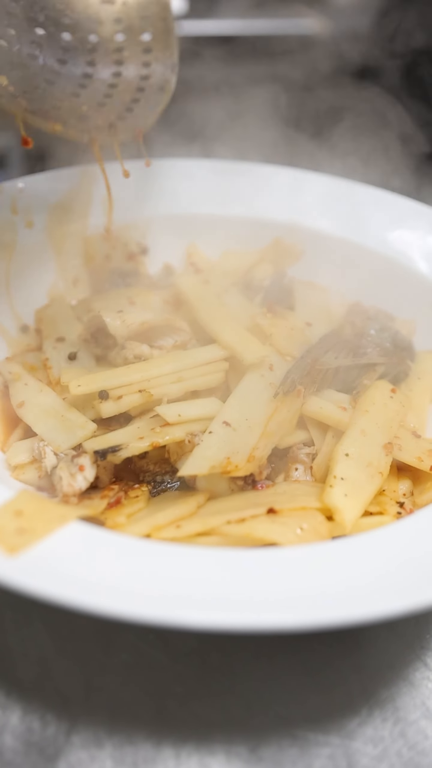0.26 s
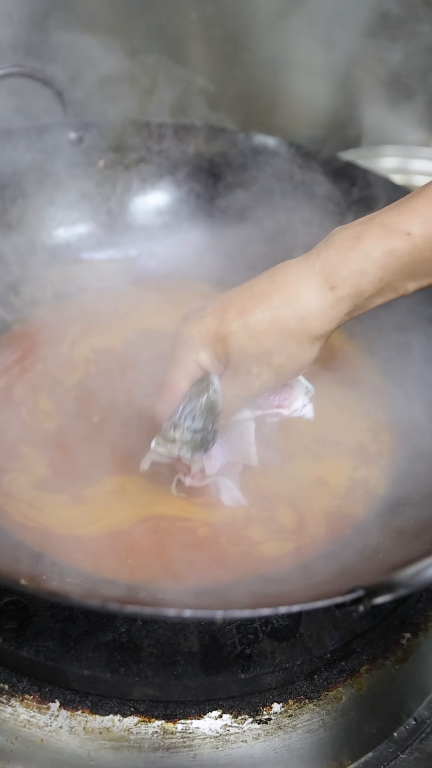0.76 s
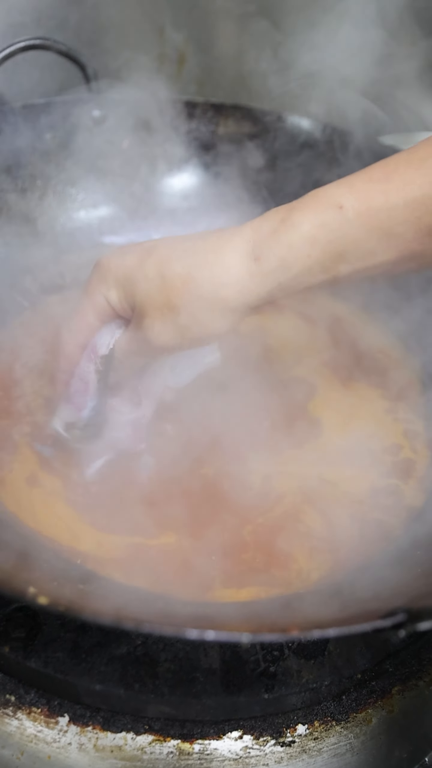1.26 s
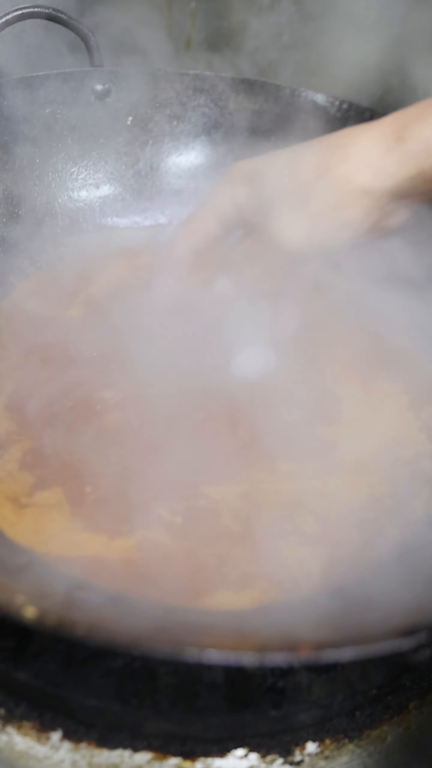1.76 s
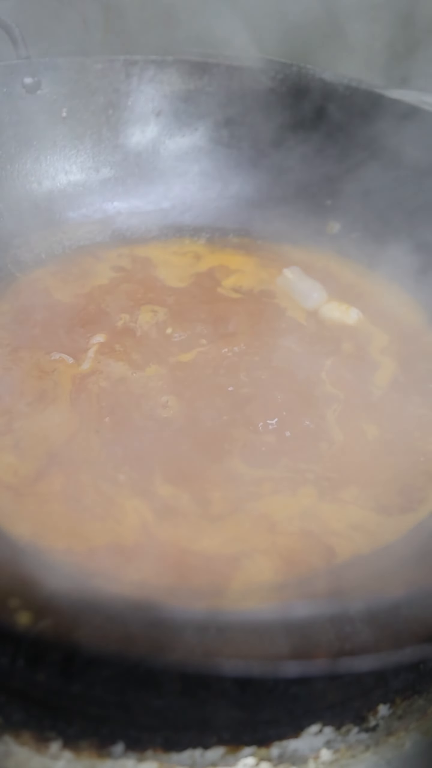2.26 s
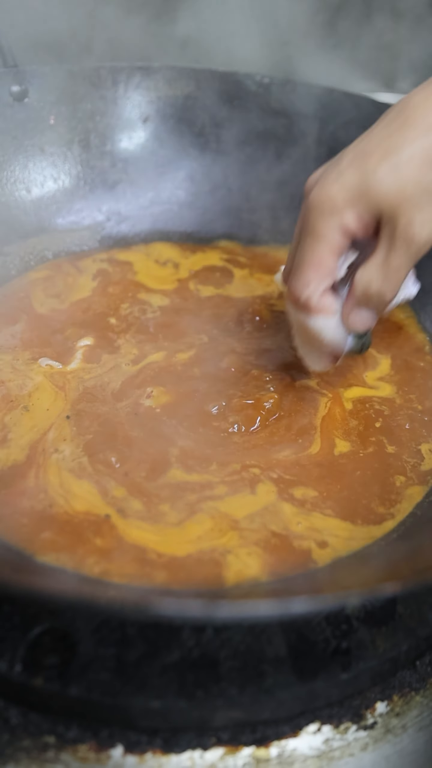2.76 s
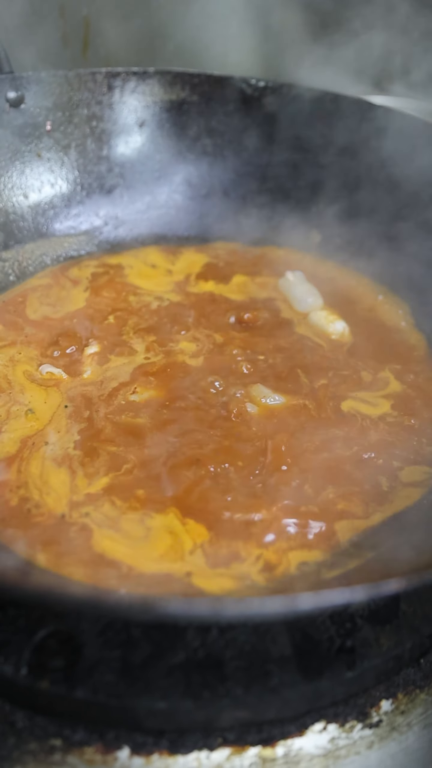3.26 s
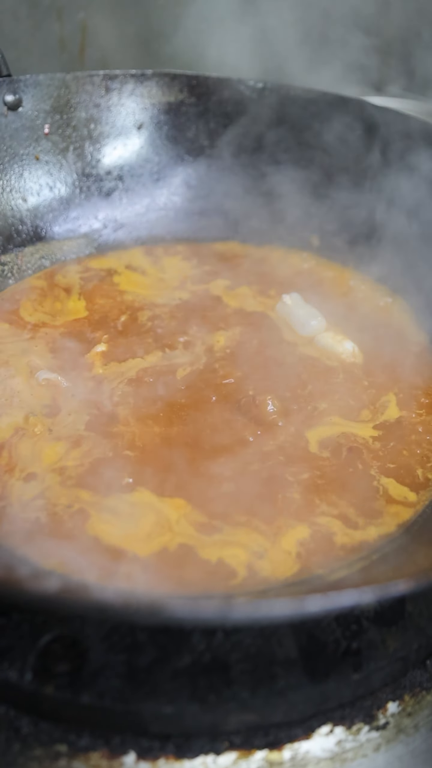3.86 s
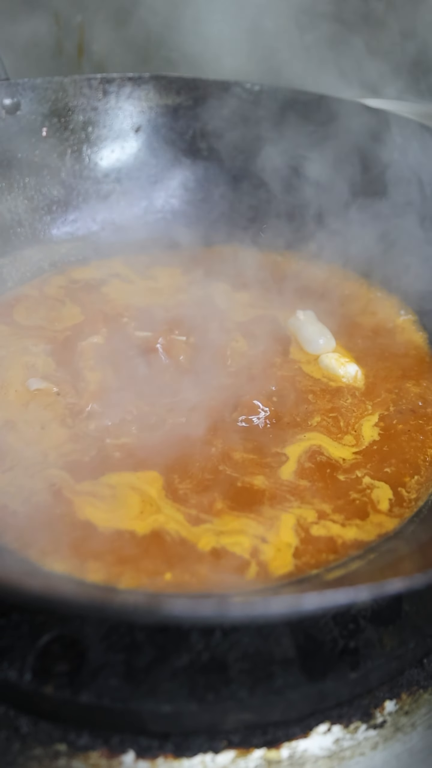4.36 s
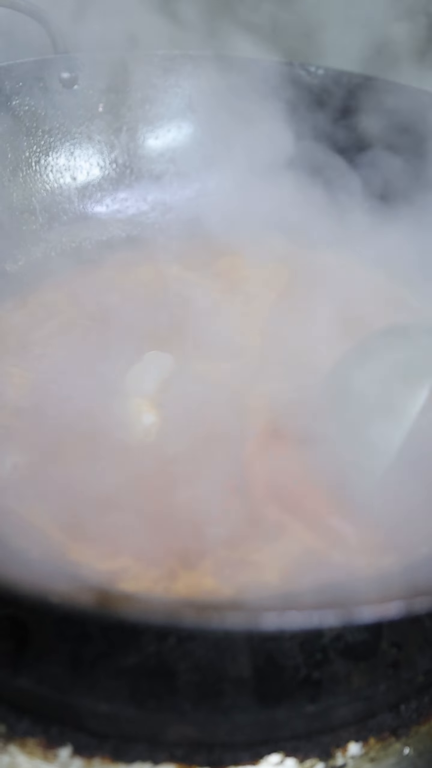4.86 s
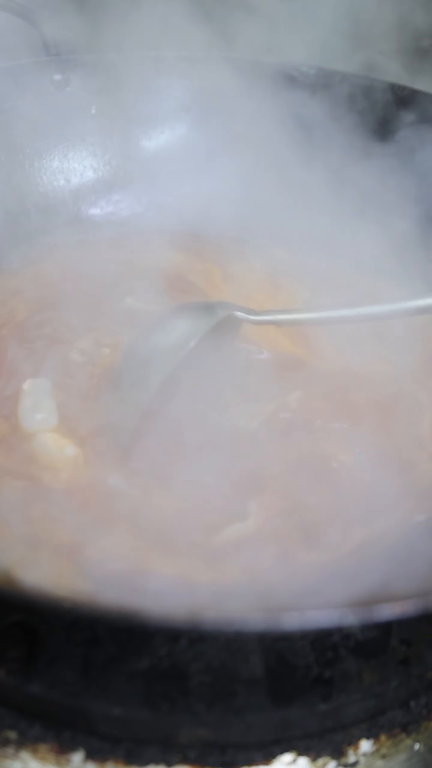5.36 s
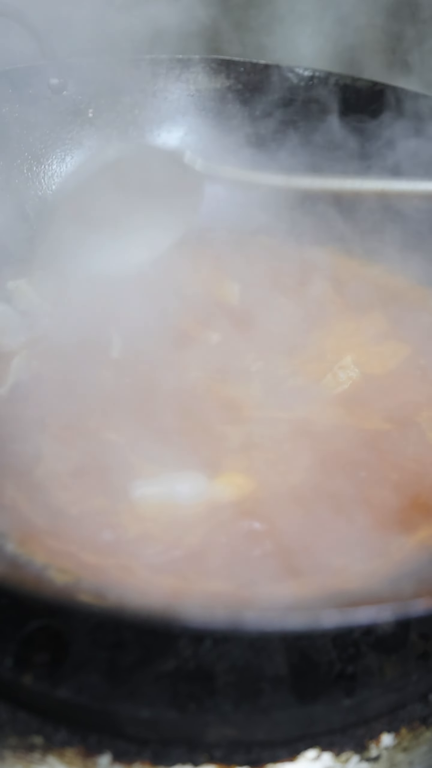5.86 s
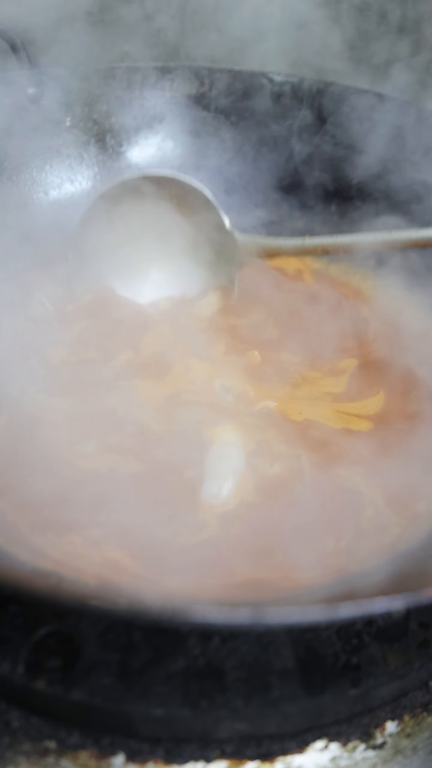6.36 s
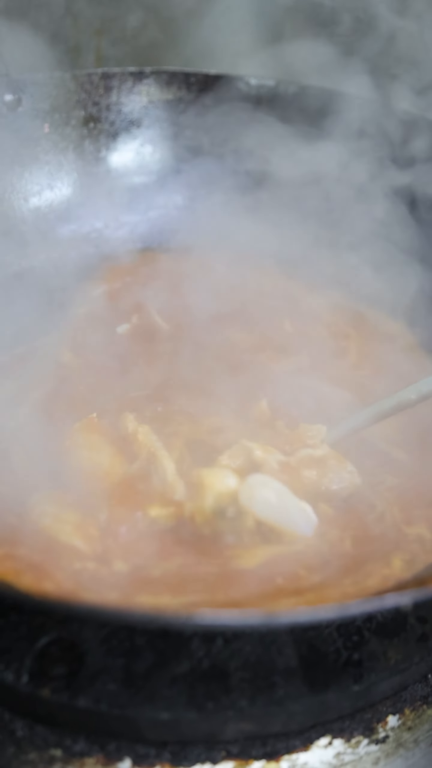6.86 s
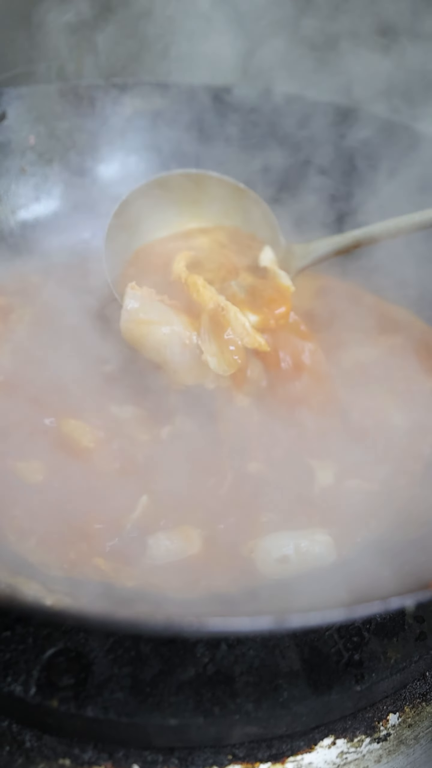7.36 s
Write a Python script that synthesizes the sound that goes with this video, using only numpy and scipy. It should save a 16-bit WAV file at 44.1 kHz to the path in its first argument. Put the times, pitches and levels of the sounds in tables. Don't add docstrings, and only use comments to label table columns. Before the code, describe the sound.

Deep drumming gas flame, first at a distance and then close up, with breathy nozzle whistling, thin metallic howls and a low fan hum.

```python
import sys
import numpy as np
from scipy import signal
from scipy.fft import rfft, irfft, next_fast_len
from scipy.io import wavfile
from scipy.ndimage import uniform_filter1d

SR = 44100
rng = np.random.default_rng(int(sys.argv[2]) if len(sys.argv) > 2 else 0)


def log_audio(samples):
    frames = np.atleast_2d(samples).T
    limited = np.clip(frames, -1, 1)
    pcm = np.round(limited * 32767).astype(np.int16)
    wavfile.write(sys.argv[1], SR, pcm)


def field_ratio(decibels):
    return 10 ** (np.asarray(decibels, dtype=float) / 20)


N = 335597
TIME_S = np.arange(N) / SR
CLOSE_UP_S, CHANGE_TAKES_S = .78, .12

# time in seconds, level in dB, lean toward the lower side mode in dB.
FLAME_STRENGTH = [(0, -29, 8.5), (.4, -31, 1), (.68, -22.5, -3), (.85, -16.5, -1.5), (1.3, -15.5, -2),
                  (1.75, -16.5, 0), (2.3, -14.5, -2.5), (2.8, -15, -3), (3.3, -16, -2), (3.6, -15, -1),
                  (4.1, -14, -1), (4.6, -14.5, 2.5), (5.1, -14.5, -1), (5.6, -14.5, 2.5), (6.15, -13, -2),
                  (6.7, -17, -3.5), (7.2, -13.5, -1.5), (7.61, -17, 5)]
# start in seconds, length in seconds, level in dB, pitch in Hz.
MAIN_SURGES = [(0.838, 0.032, -11.5, 250.8), (1.002, 0.12, -12, 239.6), (1.234, 0.083, -11, 235.6),
               (1.655, 0.05, -14.5, 238.1), (1.912, 0.062, -14, 250.4), (2.222, 0.043, -9, 238.5),
               (2.298, 0.33, -12.5, 235.8), (2.679, 0.179, -13.5, 243.1), (3.028, 0.079, -12.5, 241.0),
               (3.321, 0.065, -12.5, 248.0), (3.693, 0.094, -11, 242.8), (3.875, 0.036, -10.5, 252.3),
               (4.123, 0.21, -14.5, 246.8), (4.423, 0.04, -14, 234.9), (4.557, 0.073, -14.5, 246.1),
               (4.747, 0.18, -11, 234.4), (5.159, 0.15, -13, 236.0), (5.474, 0.033, -11, 246.1),
               (5.6, 0.126, -14, 239.1), (5.786, 0.05, -9.5, 241.2), (6.105, 0.118, -15, 219.8),
               (6.311, 0.066, -13.5, 233.1), (6.663, 0.03, -11.5, 227.5), (6.799, 0.181, -13, 240.6),
               (7.328, 0.032, -10.5, 244.0), (7.421, 0.054, -11, 248.8)]
# pitch in Hz, width in Hz.
SIDE_MODES = [(198, 29.5), (295, 67)]
# start in seconds, length in seconds, level in dB.
LOWER_FLARES = [(1.2, 0.032, -20), (1.448, 0.11, -15), (1.727, 0.096, -15), (2.449, 0.032, -27),
                (2.83, 0.064, -18.5), (3.073, 0.057, -13), (3.245, 0.11, -16), (4.068, 0.15, -16),
                (4.525, 0.14, -16), (4.832, 0.46, -17), (5.307, 0.082, -24), (5.887, 0.63, -21.5),
                (6.525, 0.042, -17.5), (7.52, 0.03, -15)]
# start in seconds, length in seconds, level in dB.
UPPER_FLARES = [
    (2.212, 0.046, -17),
    (2.938, 0.04, -12.5),
    (3.108, 0.04, -20),
    (3.68, 0.036, -13.5),
    (3.995, 0.173, -19),
    (4.447, 0.042, -14),
    (6.46, 0.03, -17),
]
# time in seconds, change in dB.
FLAME_LULLS = [(1.13, -6), (1.36, -1), (1.56, -7), (1.85, -5), (2.73, -1), (3.28, -5), (3.73, -4),
               (3.92, -4), (4.35, -5), (4.52, 1), (4.81, -10), (4.935, -13), (5.37, -5), (5.69, 0.5),
               (6.51, -3), (6.8, 2), (6.85, -7), (6.91, -7), (7.22, -8.5), (7.48, -4)]
# frequency in Hz, density in dB per Hz.
RUSH_COLOUR = [(60, -7.5), (110, -1.5), (350, -5), (430, -6), (600, -11), (750, -13), (1200, -19.5),
               (2100, -26.5), (3200, -35.5), (5000, -51), (8000, -76.5)]
# time in seconds, flow in dB, centre of the low pair in Hz, high whistle share in dB.
JET_FLOW = [(0, -40, 1545, -3.5), (.7, -41, 1535, -5.5), (.8, -37, 1510, -5), (1.3, -38, 1551, -2.5),
            (1.75, -38, 1565, -3.5), (1.95, -34.5, 1586, -6), (2.22, -37, 1500, -2),
            (2.38, -37, 1500, -10.5), (2.95, -40, 1483, -6), (3.45, -36, 1476, -7.5),
            (3.95, -39.5, 1510, -7.5), (4.42, -39.5, 1490, -7.5), (4.75, -34.5, 1520, -10.5),
            (5.0, -36, 1575, -10), (5.4, -35.5, 1530, -7.5), (6.0, -35, 1533, -9.5),
            (6.9, -36.5, 1525, -8.5), (7.61, -32.5, 1519, -8.5)]
# pitch in Hz, width in Hz.
LOW_WHISTLES = [(1480, 170), (1650, 170)]
# time in seconds, lift in dB.
GAS_PUFFS = [(.25, 0.5), (.57, 3), (2.58, 1.5), (3.56, 0), (3.79, 4), (4.22, 5), (4.56, 3.5), (5.22, 1.5),
             (5.6, 3.5), (6.25, 5), (6.45, 1.5), (6.65, 6.5), (7.03, 2), (7.18, -1.5), (7.33, 0)]
# time in seconds, change in dB.
HIGH_WHISTLE_SWELLS = [
    (.45, 2),
    (1.45, 1.5),
    (1.8, 1.5),
    (4.27, 2.5),
    (4.58, 3),
    (5.25, -0.5),
    (5.6, -2),
    (6.3, 1),
    (6.65, -1.5),
    (7.32, 3.5),
]
# time in seconds, half length in seconds, lift in dB.
OVERTONE_LIFTS = [
    (2.2, .08, 5),
    (2.6, .06, 5),
    (2.88, .05, 9.6),
    (3.2, .15, 5.4),
]
# pitch in Hz, width in Hz, level in dB.
RING_TONES = [(370.3, 5, -4), (470.5, 5, -1), (571.5, 4.3, 1.15), (573.5, 70, 0)]
# level in dB, change from afar in dB, sings from and to in seconds, lift in dB.
RING_SONG = [(-37, -1.5, 3.72, 6.5, 8), (-41, -6.5, 5.2, 6.5, 6), (-38, -15, 2.3, 10, 3),
             (-38, -8, 3.3, 6.6, 1.5)]
# time in seconds, change in dB.
RING_SWELLS = [
    [(.68, 12), (2.8, -3.5), (3.82, 4.5), (5.2, -0.5), (5.7, 0.5), (7.3, 6)],
    [(3.1, 0), (3.75, 6.5), (4.62, 9), (5.1, 6)],
    [(.95, 9), (3.25, -5), (4.2, 0), (6.1, -5)],
    [(3.7, 2.5)],
]
# frequency in Hz, density in dB per Hz.
STEAM_COLOUR = [(2700, -9.5), (3300, -2), (4200, -5), (6000, -9), (6900, -17), (7500, -28.5)]
# frequency in Hz, density in dB per Hz.
STEAM_TOP_COLOUR = [(6800, -6.5), (7300, -4.5), (8000, -9), (9000, -13.5), (10000, -30)]
# peak in seconds, lift in dB, fade in seconds.
BROTH_BURSTS = [
    (.8, 1.5, 0.35),
    (2.22, 3.5, .12),
    (2.31, 2.5, 0.21),
    (4.55, 1, .3),
    (5.46, 4.5, .2),
    (5.56, 3.5, 0.63),
    (7.22, 2.5, .4),
]
# pitch in Hz, level in dB.
MOTOR_ORDERS = [(47, 2), (101, -9.5), (150, -16)]
# time in seconds, change in dB.
MOTOR_BEATS = [
    (.45, 5),
    (.8, -6),
    (1.35, -7),
    (2.1, 0),
    (4.3, 6),
    (4.75, 4),
    (5.25, 2),
    (5.75, -8.5),
    (6.0, 9),
    (6.8, 2.5),
]
# frequency in Hz, density in dB per Hz.
RUMBLE_COLOUR = [(12, -45.5), (20, -15), (38, -10), (70, -6), (102, 9.5), (129, 0.5), (170, -7),
                 (220, -35.5), (370, -120)]
# time in seconds, change in dB.
RUMBLE_HEAVES = [(.82, 2), (1.3, -11), (1.75, -4), (2.6, 7), (2.8, 7), (3.2, 3), (3.78, 9), (4.1, 5),
                 (4.35, -17), (5.45, 4), (7.45, 1.5)]
# pitch in Hz, rms level in dB.
WHINE_TONES = [(11526, -108), (11854, -108), (12333, -96.5), (12672, -108), (14460, -108), (15429, -102),
               (15730, -96.5)]
# frequency in Hz, density in dB per Hz.
SELF_NOISE_COLOUR = [(7000, 4), (9300, 5), (10400, -7.5), (11400, -0.5), (12500, 0), (13500, -7.5),
                     (14500, 2.5), (15000, -7), (15700, 4)]


def flame():
    flame_db, lean_db = in_time(FLAME_STRENGTH)
    surge_hz = in_time([(s + length / 2, hz) for s, length, _, hz in MAIN_SURGES])[0]
    surge_hz = surge_hz + 4 * drift(6.18)
    core_hz = 241 + .7 * (surge_hz - 241)
    core = surging(flame_db - 3, MAIN_SURGES) * steadied(hoarse_tone(core_hz, 29), 0.092, .8)
    sides = 0
    for (hz, width_hz), way, flares in zip(SIDE_MODES, (1, -1), (LOWER_FLARES, UPPER_FLARES)):
        calm_db = flame_db - 7 + way * lean_db + 1.5 * drift(5)
        tone = steadied(hoarse_tone(hz, width_hz), 0.13, 0.85)
        sides = sides + field_ratio(-2.5) * surging(calm_db, flares) * tone
    flutter_db = 0.74 * drift(15) + swells(FLAME_LULLS, .025)
    return (core + sides) * field_ratio(flutter_db)


def gas_rush():
    rush_db = -25 - 2 * afar() + 0.19 * TIME_S
    return field_ratio(rush_db) * evened(coloured(RUSH_COLOUR), 0.03, 0.3)


def jets():
    flow_db, centre_hz, share_db = in_time(JET_FLOW)
    flow_db = flow_db - 0.5 + swells(GAS_PUFFS, 0.097)
    lower_hz, upper_hz = LOW_WHISTLES[0][0], LOW_WHISTLES[1][0]
    upper = np.clip((centre_hz - lower_hz) / (upper_hz - lower_hz) + 0.075, .03, .97)
    low_db = flow_db + 10 * np.log10([1 - upper, upper])
    low = 0
    for db, (hz, width_hz), strand_db in zip(low_db, LOW_WHISTLES, (-6, -7.5)):
        low = low + field_ratio(db - 0.8) * steadied(hoarse_tone(hz, width_hz), 0.0097, 0.25)
        low = low + field_ratio(db + strand_db) * hoarse_tone(hz + 30 * drift(1.5), 45)

    high_db = flow_db + share_db + swells(HIGH_WHISTLE_SWELLS, .14) - 1
    high_hz = 2540 + 20 * drift(3)
    high = steadied(hoarse_tone(high_hz, 222), 0.022, 0.37)
    high = high + field_ratio(-6.5) * hoarse_tone(high_hz + 25 * drift(1.5), 49)
    high = high + field_ratio(-6.5) * hoarse_tone(2800, 300)

    overtone_db = -63.5 + sum(db * bump(s, width, width) for s, width, db in OVERTONE_LIFTS)
    return low + field_ratio(high_db) * high + field_ratio(overtone_db) * hoarse_tone(4130, 510)


def burner_ring():
    ring = 0
    for song, flares, (hz, width_hz, mode_db) in zip(RING_SONG, RING_SWELLS, RING_TONES):
        db, far_db, start_s, end_s, lift_db = song
        level_db = db + mode_db + far_db * afar() + lift_db * (step(start_s, 0.083) - step(end_s, .2))
        level_db = level_db + 1.4 * drift(2.5) + swells(flares, .15)
        ring = ring + field_ratio(level_db) * steadied(hoarse_tone(hz + 0.36 * drift(1.04), width_hz), 0.05, 1.0)
    return ring


def steam():
    swell_db = 1.5 * step(2.18, .05)
    swell_db = swell_db + sum(db * bump(s, .1, fade) for s, db, fade in BROTH_BURSTS)
    body = field_ratio(-54.5 + swell_db) * steadied(coloured(STEAM_COLOUR), 0.018, 0.95)
    return body + field_ratio(-81.5 + 2 * swell_db) * steadied(coloured(STEAM_TOP_COLOUR), .02, .8)


def fan():
    hum_db = -37 - 4 * step(3.05, .1) + 2 * drift(2.5) + swells(MOTOR_BEATS, 0.16)
    rumble_db = -33 - 15 * afar() + drift(4) + swells(RUMBLE_HEAVES, 0.11)
    hum = sum(field_ratio(db) * steadied(hoarse_tone(hz, 6.8), 0.098, 0.92) for hz, db in MOTOR_ORDERS)
    return field_ratio(hum_db) * hum + field_ratio(rumble_db) * steadied(coloured(RUMBLE_COLOUR), 0.14, 1.0)


def electronics():
    whine = sum(field_ratio(db + 2.5) * hoarse_tone(hz, 45) for hz, db in WHINE_TONES)
    return field_ratio(-6 * afar()) * (whine + field_ratio(-93.5) * coloured(SELF_NOISE_COLOUR))


def hoarse_tone(hz, width_hz):
    phase = 2 * np.pi * np.cumsum(hz * np.ones(N)) / SR
    low_pass = signal.butter(2, width_hz / 2, fs=SR, output="sos")
    a, b = signal.sosfilt(low_pass, rng.standard_normal((2, N)))
    return rms_one(a * np.cos(phase) + b * np.sin(phase))


def coloured(spectrum):
    size = next_fast_len(N)
    hz = np.maximum(np.arange(size // 2 + 1) * SR / size, 1)
    points = np.array(spectrum)
    gain_db = np.interp(np.log(hz), np.log(points[:, 0]), points[:, 1], left=-120, right=-120)
    return rms_one(irfft(rfft(rng.standard_normal(size)) * field_ratio(gain_db), size)[:N])


def steadied(x, over_s, share):
    size = max(int(over_s * SR / 2), 1)
    power = uniform_filter1d(uniform_filter1d(x ** 2, size), size)
    return rms_one(x / (power + 1e-4 * power.mean()) ** (np.clip(share, 0, 1) / 2))


def evened(x, over_s, share):
    size = next_fast_len(N)
    thirds = 3 * np.log2(np.maximum(np.arange(size // 2 + 1) * SR / size, 1))
    spectrum, out = rfft(x, size), 0
    for centre in range(17, 40):
        band = irfft(spectrum * np.clip(1 - abs(thirds - centre), 0, 1), size)[:N]
        band_rms = np.sqrt(np.mean(band ** 2))
        out = out + band_rms * steadied(band, over_s + 2.7 / 2 ** (centre / 3), share)
    return rms_one(out)


def surging(calm_db, surges):
    edge = 0.025
    shapes = []
    for s, length, db, *_ in surges:
        corners = np.cumsum([s - edge / 2, edge, max(length - edge, 0), edge])
        shapes.append((corners, field_ratio(db) * np.array([0, 1, 1, 0])))
    return np.maximum(summed(shapes), field_ratio(calm_db))


def swells(rows, width_s):
    return summed(([s - width_s, s, s + width_s], [0, db, 0]) for s, db in rows)


def summed(shapes):
    t = np.arange(0, N / SR + .002, .001)
    return np.interp(TIME_S, t, sum(np.interp(t, corners, heights) for corners, heights in shapes))


def step(at_s, takes_s):
    return np.interp(TIME_S, [at_s - takes_s / 2, at_s + takes_s / 2], [0, 1])


def bump(at_s, rise_s, fade_s):
    return np.interp(TIME_S, [at_s - rise_s, at_s, at_s + fade_s], [0, 1, 0])


def afar():
    return 1 - step(CLOSE_UP_S, CHANGE_TAKES_S)


def drift(rate):
    r = np.exp(-80 * np.pi * rate / SR)
    slow = signal.lfilter([1], [1, -2 * r, r * r], rng.standard_normal(N // 40 + 2002))[2000:]
    return np.interp(np.arange(N) / 40, np.arange(len(slow)), rms_one(slow))


def in_time(rows):
    s, *columns = np.transpose(rows)
    return [np.interp(TIME_S, s, c) for c in columns]


def rms_one(x):
    return x / np.sqrt(np.mean(x ** 2) + 1e-20)


def scene():
    return (flame() + gas_rush() + jets() + burner_ring() + steam() + fan())[None]


def band_limit(x):
    return signal.sosfilt(signal.butter(12, 15780, fs=SR, output="sos"), x)


def record(dry):
    rounded = 1.536 * np.tanh(dry / 1.463)
    dull = signal.sosfilt(signal.butter(4, 8500, fs=SR, output="sos"), rounded)
    return band_limit(dull + electronics())


dry = scene()
out = record(dry)
log_audio(out)
```